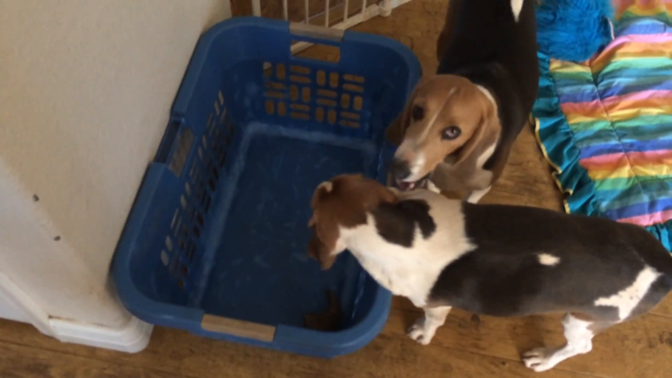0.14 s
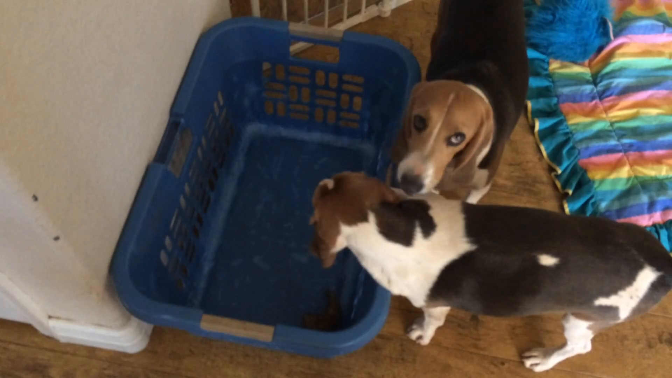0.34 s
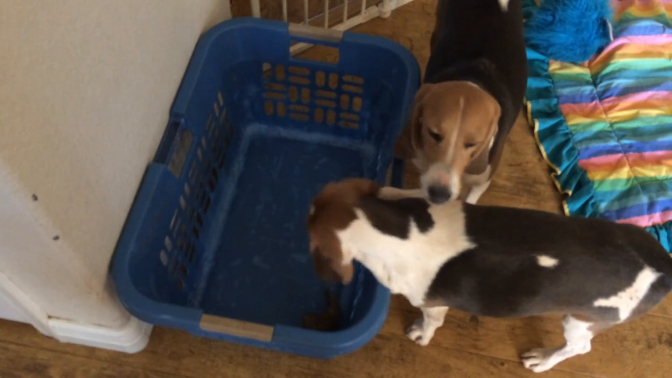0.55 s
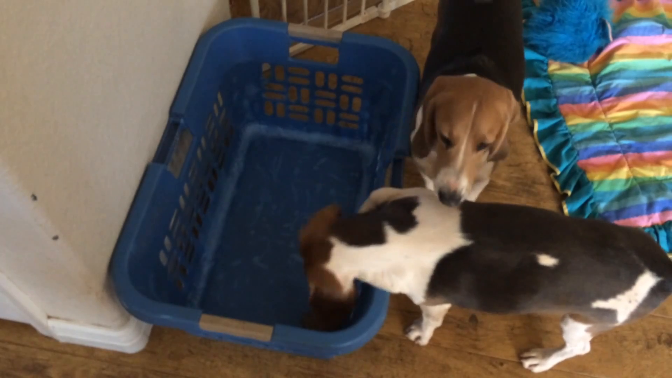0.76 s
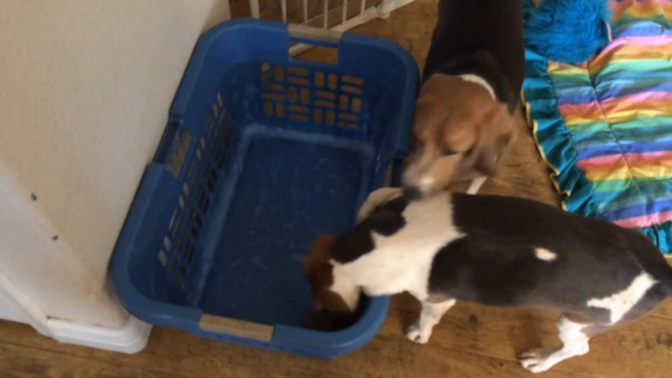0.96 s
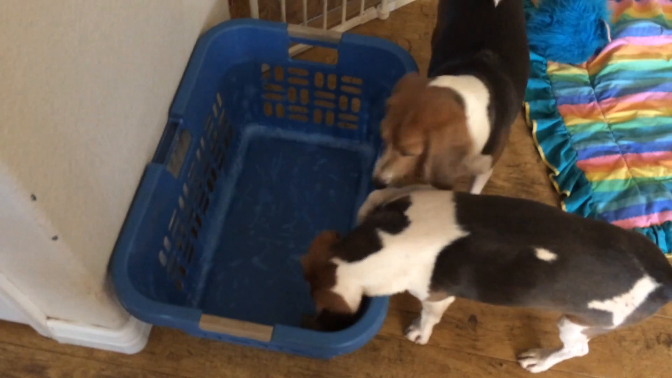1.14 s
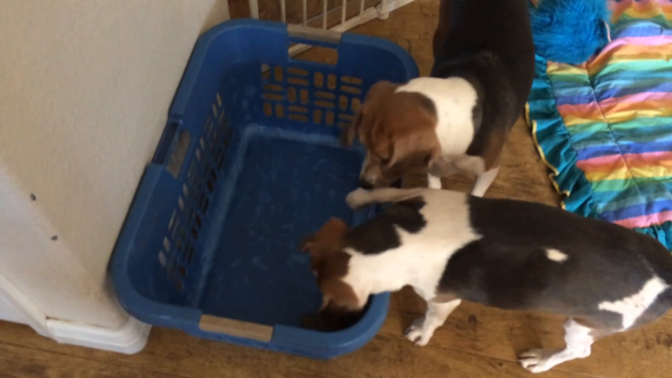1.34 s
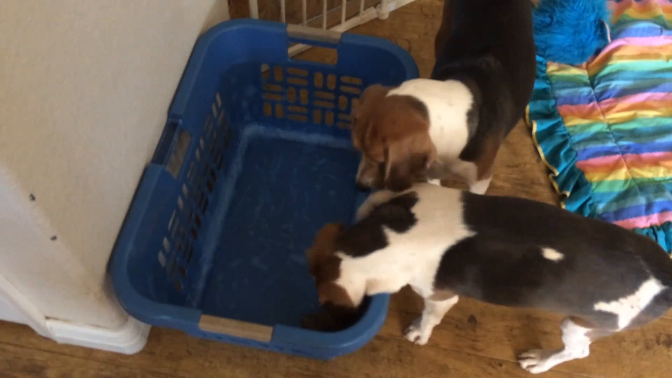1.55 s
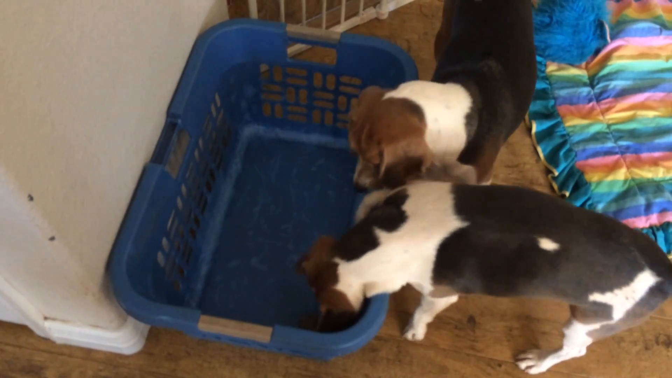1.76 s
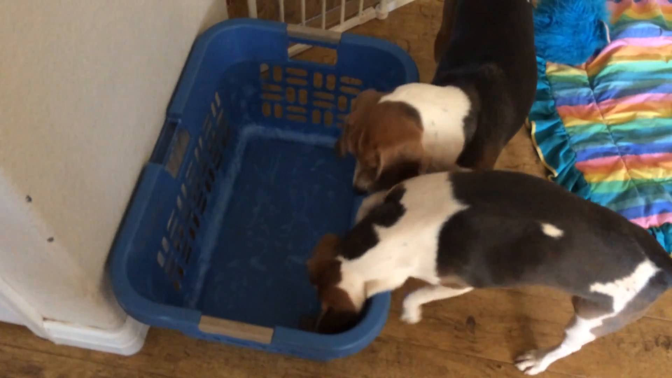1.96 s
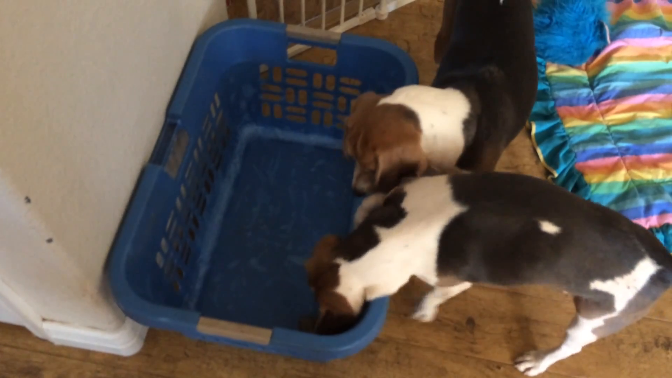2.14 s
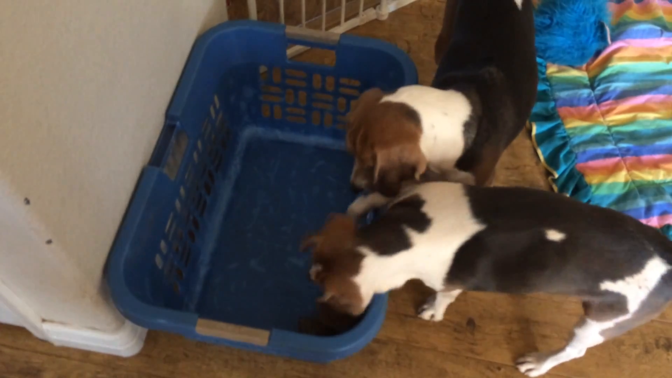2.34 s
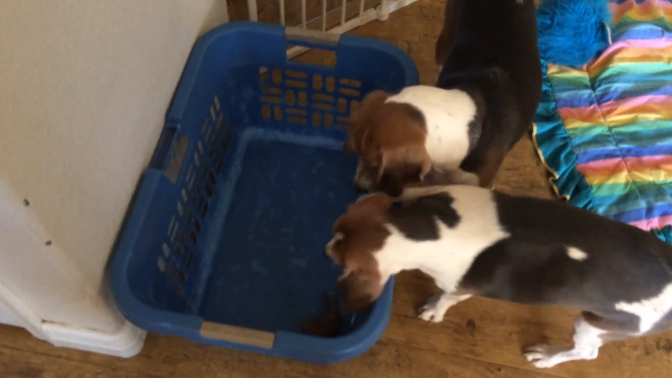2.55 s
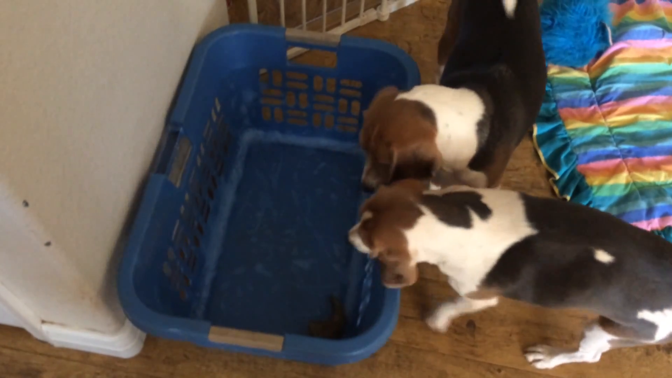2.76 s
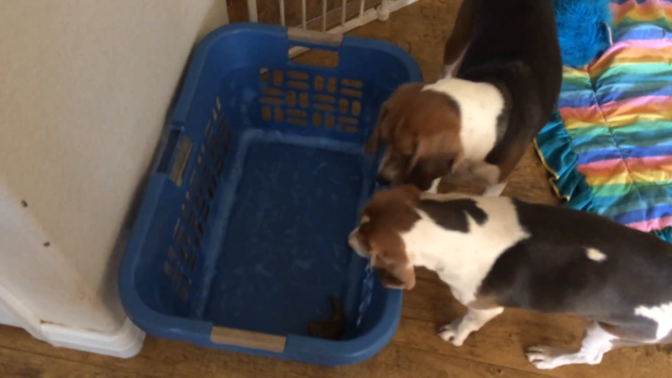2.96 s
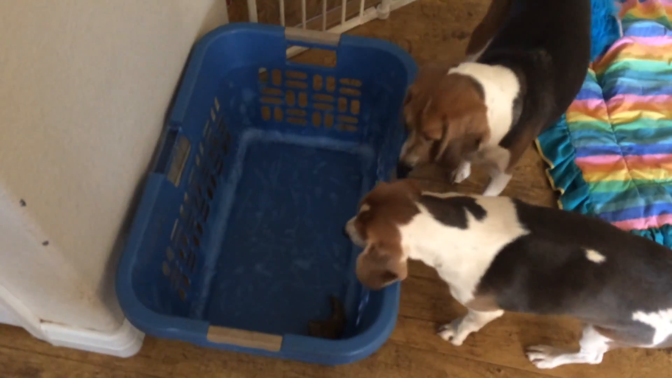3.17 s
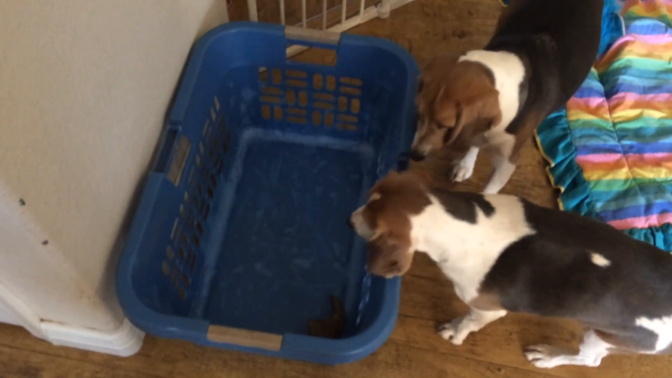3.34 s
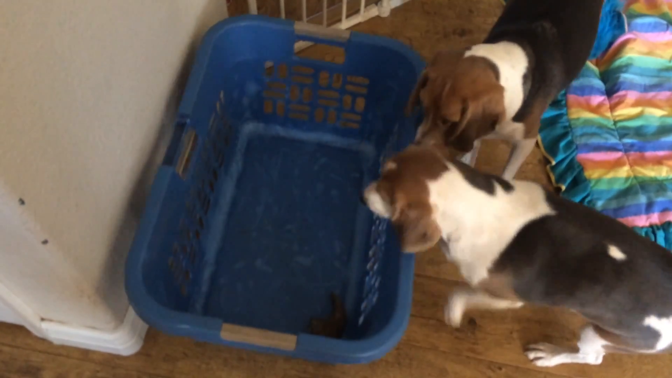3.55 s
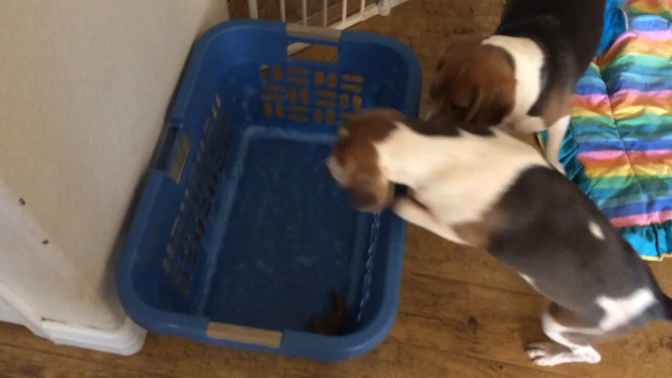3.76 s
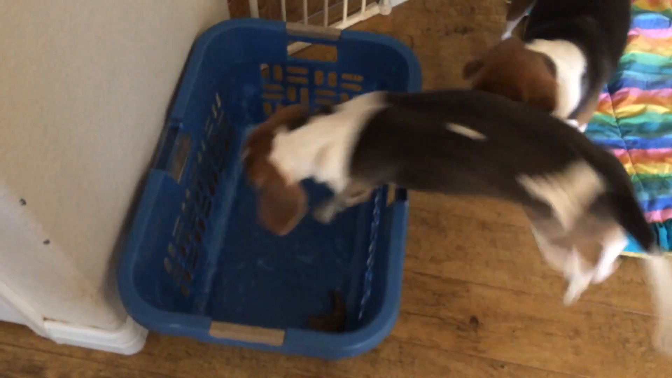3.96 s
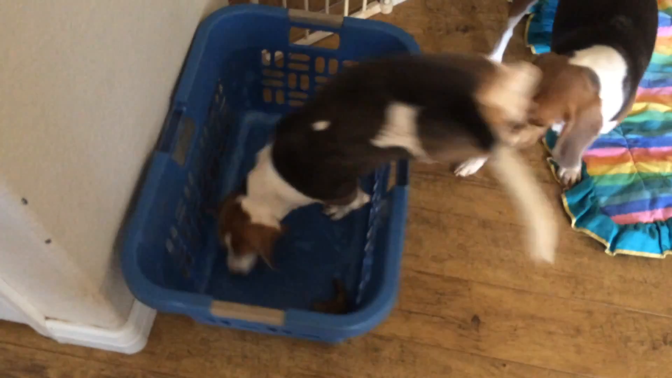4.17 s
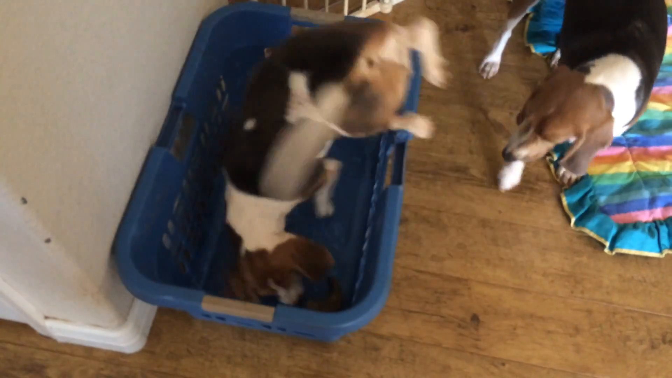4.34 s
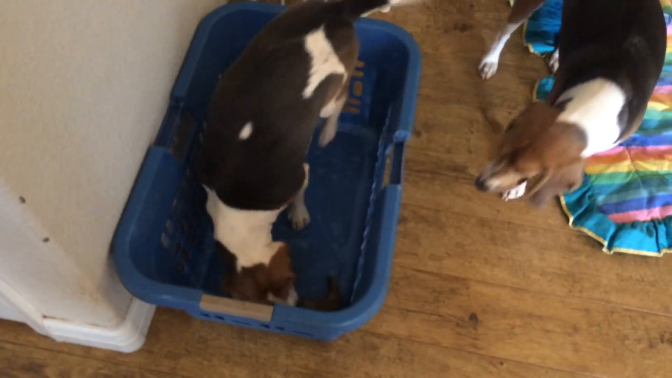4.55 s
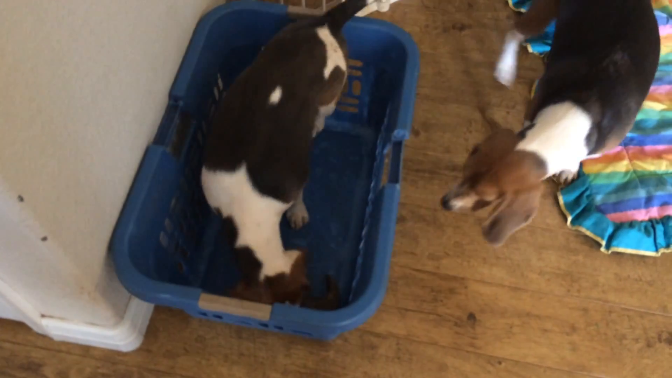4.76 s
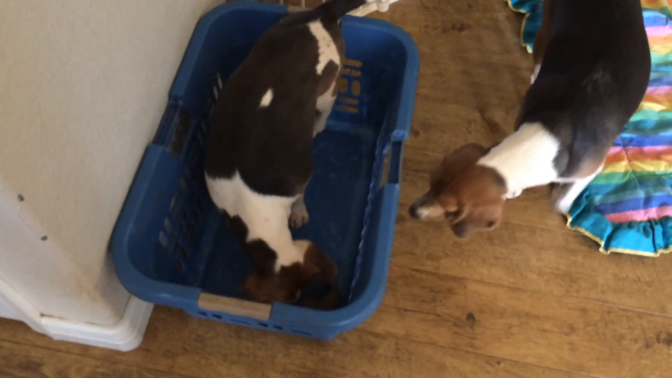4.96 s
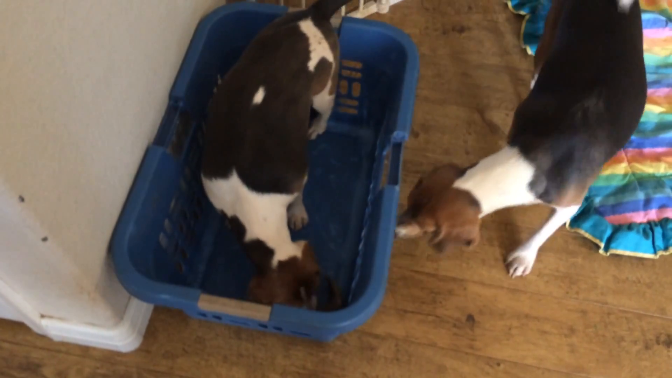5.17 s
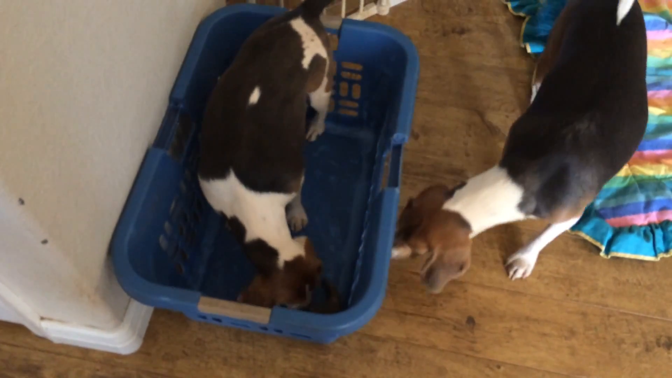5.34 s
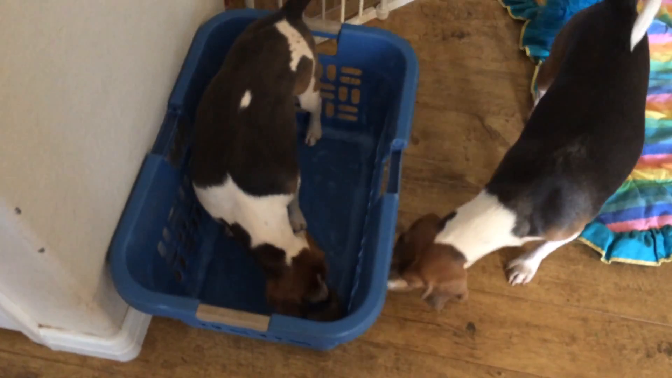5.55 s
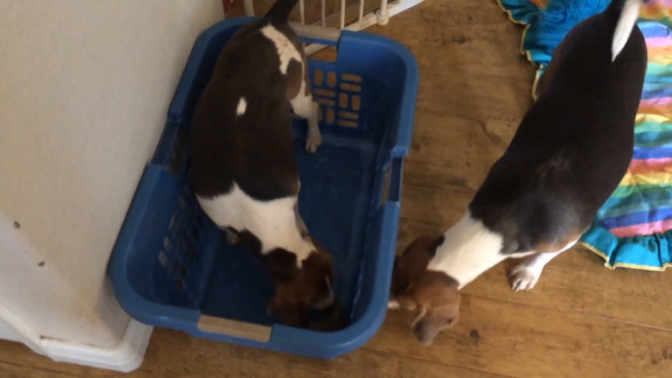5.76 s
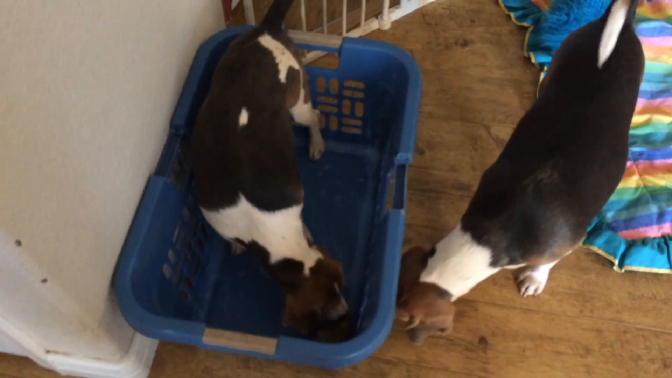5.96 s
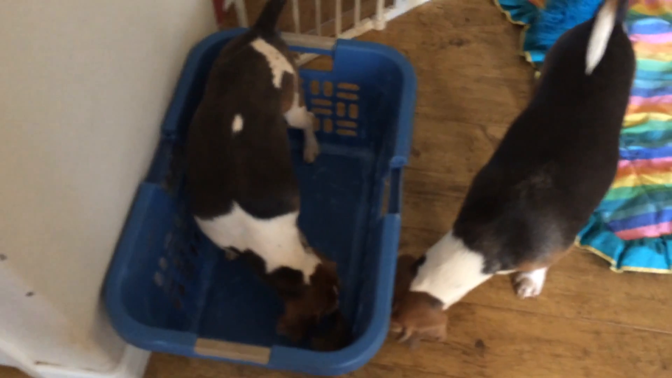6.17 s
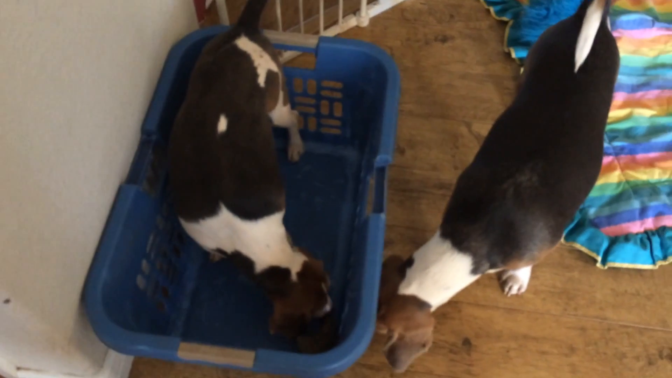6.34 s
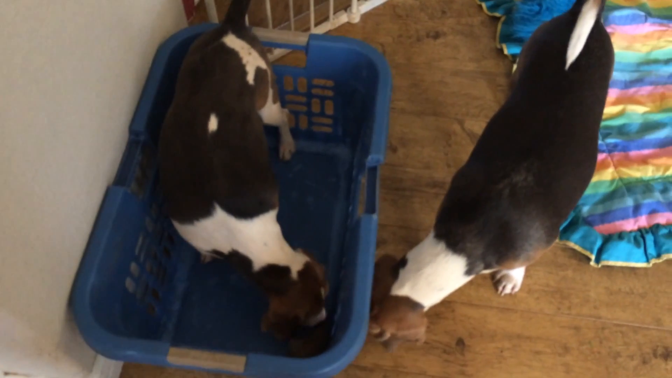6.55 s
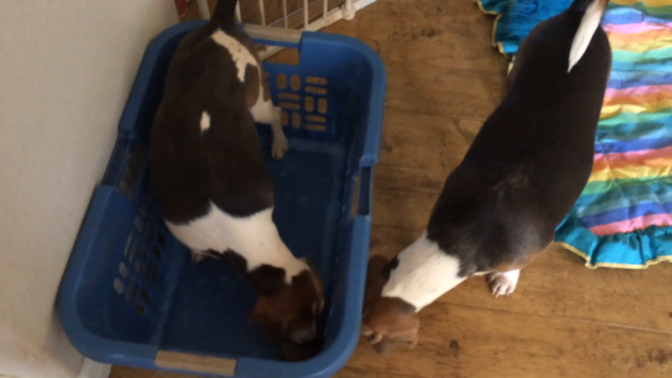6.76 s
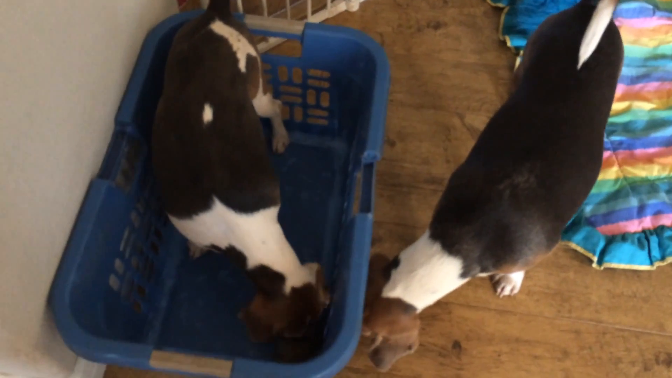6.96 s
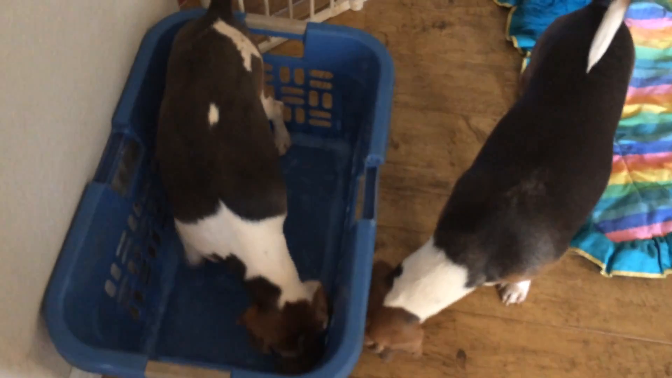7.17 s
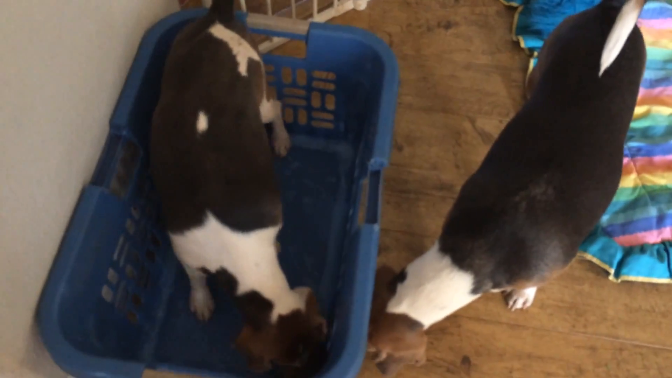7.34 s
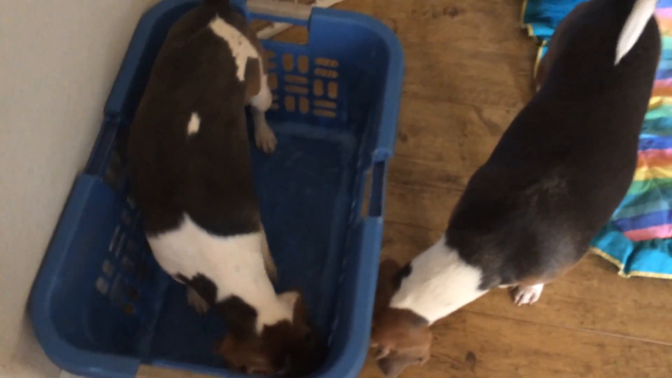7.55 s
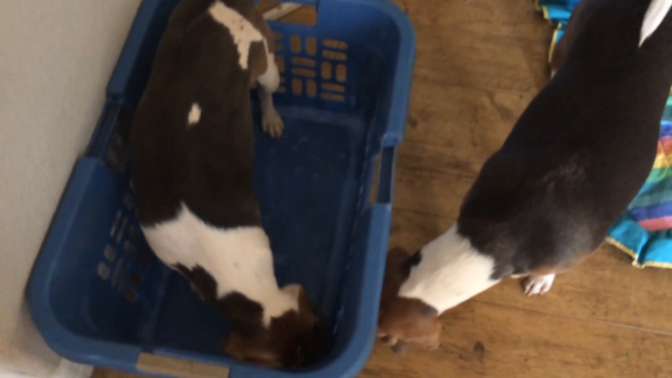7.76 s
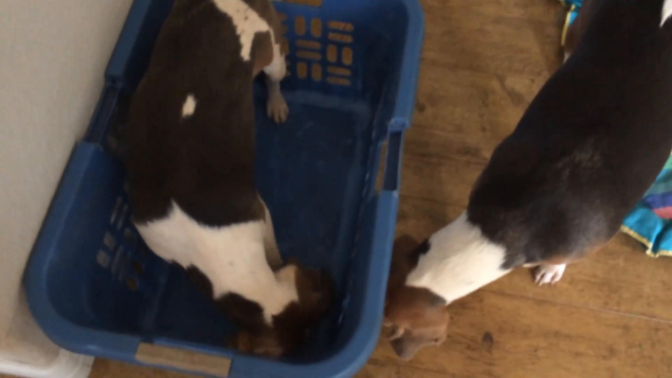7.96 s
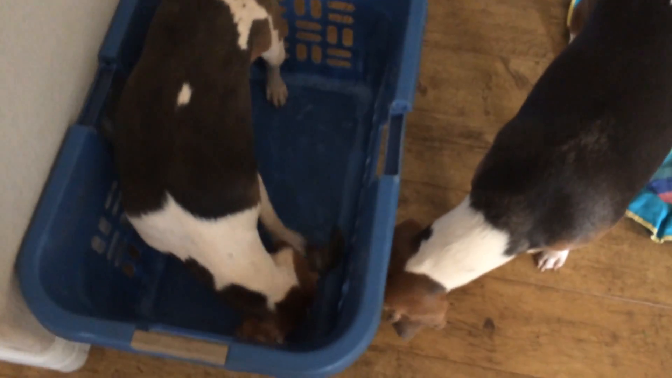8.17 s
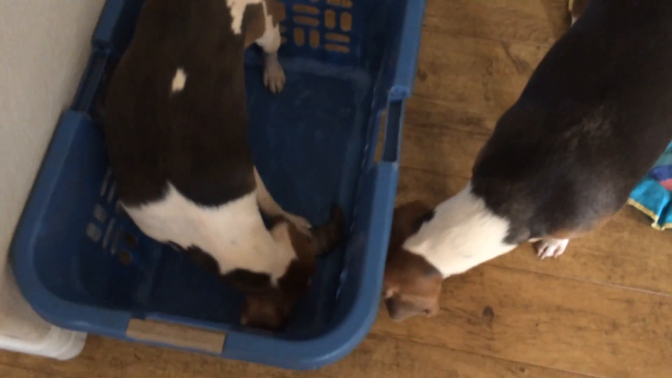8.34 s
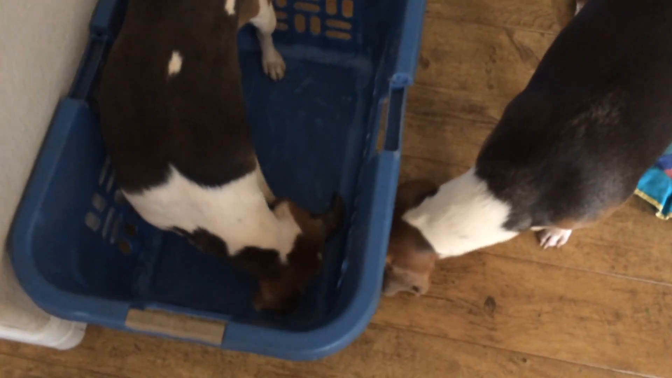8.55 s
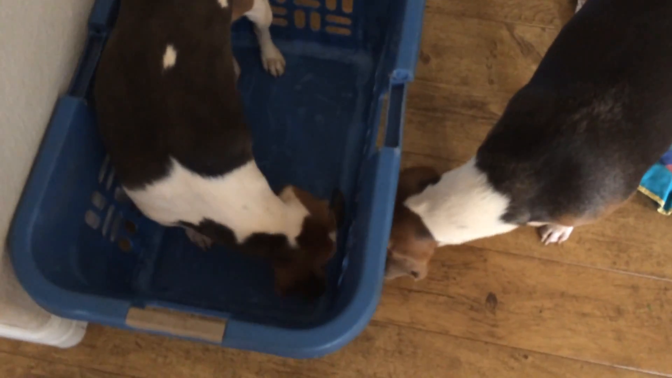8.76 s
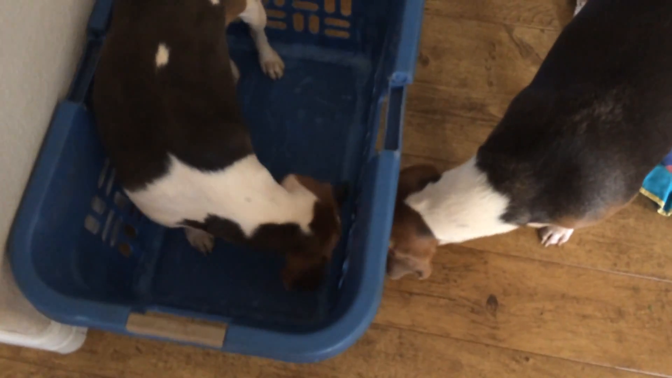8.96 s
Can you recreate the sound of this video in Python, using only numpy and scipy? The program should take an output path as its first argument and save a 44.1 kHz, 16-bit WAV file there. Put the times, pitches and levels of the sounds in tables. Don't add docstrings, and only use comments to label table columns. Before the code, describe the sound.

Faint brushes and ticks, then a burst of hollow plastic thuds and claw clatter, one later heavy paw knock, and scattered scratching over quiet hum.

```python
import sys
import numpy as np
from scipy import signal
from scipy.fft import rfft, irfft
from scipy.io import wavfile

SR = 44100
rng = np.random.default_rng(int(sys.argv[2]) if len(sys.argv) > 2 else 0)


def master(y):
    cut = np.clip(np.atleast_2d(y).T, -1, 1)
    pcm = np.round(cut * 32767)
    wavfile.write(sys.argv[1], SR, pcm.astype(np.int16))


def to_linear_factor(level_db):
    exponent = np.asarray(level_db, float) / 20
    return 10 ** exponent


N = 397341


def band(x, low_hz, high_hz):
    return signal.sosfilt(signal.butter(2, [low_hz, high_hz], "band", fs=SR, output="sos"), x)


def rms_one(x):
    return x / np.sqrt(np.mean(x ** 2) + 1e-20)


def peak_one(x):
    return x / np.max(np.abs(x))


def at_hz(hz, points_hz, values):
    return np.interp(np.log(hz), np.log(points_hz), values)


def drift(rate_hz):
    knot_hz = 400
    knots = rng.standard_normal(int(N / SR * knot_hz) + 2)
    r = np.exp(-2 * np.pi * rate_hz / knot_hz)
    slow = signal.lfilter([1], [1, -2 * r, r * r], np.tile(knots, 2))[len(knots):]
    return np.interp(np.arange(N) / SR * knot_hz, np.arange(len(slow)), rms_one(slow))


def ring(clicks, hz, t60_s):
    r, w = to_linear_factor(-60 / (t60_s * SR)), 2 * np.pi * hz / SR
    return signal.lfilter([0, np.sin(w)], [1, -2 * r * np.cos(w), r * r], clicks + 1e-18)


def resonances(x, peaks, patchy_db=0):
    out = 0
    for k, (hz, width_hz, level_db) in enumerate(peaks):
        r = np.exp(-np.pi * width_hz / SR)
        poles = [1, -2 * r * np.cos(2 * np.pi * hz / SR), r * r]
        patches_db = patchy_db * drift(20.0) if patchy_db else 0
        mode = signal.lfilter([1 - r * r, 0, r * r - 1], poles, x)
        out = out + (-1) ** k * to_linear_factor(level_db + patches_db) * mode
    return rms_one(out)


# start_s, peak_db, wall_hz, hardness_db
TICKS = [(0.359, -66, 890, -20), (0.408, -64.5, 877, 7.5), (2.302, -38.5, 1954, 10),
         (2.354, -31, 670, -3.5), (3.174, -33.5, 1075, -29), (3.187, -37.5, 770.4, -3.5),
         (3.657, -67, 1500, 9.5), (4.048, -48.5, 1500, 4), (4.1457, -25.5, 925, 5.5), (4.178, -17, 2000, 0),
         (4.271, -25, 865, -12.5), (4.348, -20, 756, -25), (4.417, -34, 1500, 6.5),
         (4.4315, -6.5, 856, -2.5), (4.731, -60, 1620, 7), (3.657, -65, 1500, 9), (4.048, -53, 1502, 5.5),
         (5.239, -48, 1475, 1), (5.443, -37, 896.5, -4), (5.477, -37.5, 917, -5), (5.493, -32, 935, -2),
         (5.597, -54, 1515, 3), (5.999, -48, 838, 4.5), (7.146, -46, 1490, -1), (7.321, -49.5, 1310, -15.5),
         (7.512, -45.5, 972, -1), (8.776, -47, 937, -21), (8.824, -33, 915, -38)]
# start_s, peak_db, wall_hz, hardness_db
CLACKS = [(0.06, -49, 2050, -22), (0.541, -44.5, 706, -14), (1.309, -60, 645, 7), (1.564, -49.5, 1600, -13),
          (2.26, -66, 820, 9), (2.319, -39.5, 1280, 12), (2.341, -30, 1000, -15), (2.974, -46.5, 721, 4),
          (3.288, -32.5, 1210, 10.5), (3.308, -38, 2040, 15), (3.647, -56.5, 899, 8),
          (3.857, -31.5, 1507, 0.5), (3.889, -34, 1000, -15), (4.402, -13.5, 1440, 0),
          (4.4445, -14.5, 1140, -1), (4.481, -20.5, 910, 1), (5.2456, -22.5, 963, -8.5),
          (5.428, -17.5, 900, -13), (5.464, -18, 1030, -10.5), (6.409, -45.5, 859, -14.5),
          (7.274, -28, 1010, -22), (7.443, -42, 940, -18.5), (7.657, -32.5, 1000, -15),
          (7.854, -27.5, 897, -13.5), (7.906, -35, 870, -17), (8.195, -36, 1024, 0.5),
          (8.697, -38.5, 1270, -23)]
# start_s, peak_db, wall_hz, hardness_db
RATTLES = [
    (3.874, -8.5, 850, -10),
    (3.924, -23.5, 1270, -1.5),
    (3.939, -15.5, 750, -6),
    (3.966, -9.5, 1060, -8),
    (4.3055, -18, 960, -7.5),
    (7.169, -53.5, 1122, 1.5),
    (7.962, -30, 860, 0.5),
]
# start_s, peak_db, wall_hz, hardness_db
NICKS = [(3.932, -32.5, 1300, 3), (3.976, -18, 1500, -13), (4.152, -23.5, 1500, 3), (4.194, -21, 2000, -10),
         (4.2175, -15.5, 1610, -4.5), (4.299, -27.5, 1500, -0.5), (4.302, -25, 2200, 0),
         (4.43, -5.5, 820, 3), (4.623, -59, 1500, 9.5), (4.83, -34, 1400, 8.5), (5.2, -49.5, 1510, 2.5),
         (5.452, -46, 1000, -0.5), (5.507, -43, 1000, 2.5), (7.9536, -34, 1200, 0),
         (7.968, -30.5, 1900, -8.5), (10, -35.5, 1600, -3), (8.24, -35.5, 2000, -5), (9.2, -34, 1100, -8),
         (8.312, -36.5, 1600, -5.5), (8.339, -35.5, 1100, -10), (8.372, -42.5, 900, -12)]


def claws():
    kinds = [  # rows, top_db re hardness, chatter t60_s
        (TICKS, 1.1, 0.029), (CLACKS, -12, 0.029), (RATTLES, -4, 0.048), (NICKS, -1.5, 0.0059)]
    rise_s, top_lasts = 0.00069, 1.6
    out, t = np.zeros(N), np.arange(SR // 8) / SR
    for rows, top_db, t60_s in kinds:
        for start_s, peak_db, wall_hz, hardness_db in rows:
            chatter = rng.standard_normal(len(t))
            force = chatter * to_linear_factor(-60 * t / t60_s) * np.minimum(t / rise_s, 1)
            force[8] += 5.0
            quick = force * to_linear_factor(-60 * t / (top_lasts * t60_s))
            tone = resonances(force, [(wall_hz, wall_hz * 0.4, 0), (1200, 1800, -7)])
            body = peak_one(band(tone, 450, 2700))
            edge = to_linear_factor(hardness_db + 4.0) * peak_one(band(force, 2900, 7900))
            top = to_linear_factor(hardness_db + top_db + 5.0) * peak_one(band(quick, 6140, 11400))
            blow = to_linear_factor(peak_db - 3.0) * (body + edge + top)
            i = round(start_s * SR)
            out[i:i + len(t)] += blow[:N - i]
    return out


# mode_hz, width_hz, level_db
WALL = [(728, 45, 10.5), (839, 11, 3.5), (970, 150, 1), (1060, 35, 8.5), (1274, 51, -6), (1410, 55, -8.5),
        (1700, 44, -11), (2140, 40, -2.5), (2491, 17, -17), (2655, 110, 5), (3280, 77, -15),
        (3400, 54, -11.5)]


def wall(x, ring_db):
    return x + to_linear_factor(ring_db) * np.sqrt(np.mean(x ** 2)) * resonances(x + 1e-18, WALL)


# mode_hz, level_db, t60_s
TUB = [(88, -7, 0.048), (145, 0, 0.15), (200, -1, 0.31), (291, -3, 0.26), (330, 0, 0.19), (364, -6.5, 0.21),
       (434, 4, 0.24), (626, -12.5, 0.089), (670, -10.5, 0.088)]


def tub(starts_s, strengths_db):
    at = np.round(starts_s * SR).astype(int)
    out = 0
    for k, (mode_hz, level_db, t60_s) in enumerate(TUB):
        luck_db = 6.0 * rng.standard_normal(len(at))
        clicks = np.zeros(N)
        clicks[at] = to_linear_factor(strengths_db + level_db + luck_db) * (-1) ** k
        out = out + ring(clicks, mode_hz, t60_s)
    return signal.lfilter([0.08], [1, -0.92], out)


# start_s, peak_db (under 600 Hz), push_hz, share_db (left ringing in the tub)
THUDS = [(2.02, -57, 180, 0), (2.342, -35, 201, -10), (3.174, -37.5, 160, -8), (3.875, -15, 369, -10),
         (3.877, -20.5, 435, -29), (3.882, -25, 151, -13), (3.9379, -13, 315, -25), (3.965, -34, 286, 6),
         (4.11, -42, 127, 0.5), (4.206, -37, 177, 0.5), (4.303, -28.5, 307, -13), (4.35, -35, 192, 5),
         (4.383, -27.5, 128, -25), (4.4292, -25.5, 461, -6.5), (4.804, -42.5, 340, -1.5),
         (4.838, -28, 172, -29), (5.153, -40, 315, -19), (5.183, -52, 421, 5.5), (5.255, -33.5, 198, -2.5),
         (5.284, -41, 182, -0.5), (5.425, -42.5, 176, 1.5), (5.462, -9, 361, -15.5),
         (5.49, -18.5, 365, -33.5), (6.01, -36.5, 333, -21.5), (6.415, -43, 210, -9.5),
         (7.06, -49.5, 284, -9), (7.23, -44.5, 260, -8), (7.279, -29, 374, -8), (7.291, -30, 229, -20),
         (7.851, -23, 354, -33), (7.866, -35.5, 340, -8), (7.897, -42, 330, -25), (7.906, -35.5, 213, -31),
         (7.924, -47, 260, -25), (7.942, -36, 285.4, -1), (8.701, -45.5, 201, -26),
         (8.775, -44.5, 233, -14), (8.828, -45.5, 484, -12.5), (8.87, -60.5, 367, -0.5),
         (8.95, -57, 372, 0.5)]


def thuds():
    rows, out = np.array(THUDS), np.zeros(N)
    t = np.arange(SR // 4) / SR
    for start_s, peak_db, push_hz, share_db in THUDS:
        cycles = t * push_hz / 1.3
        push = (cycles * np.exp(1 - cycles)) ** 3.1
        panel = to_linear_factor(share_db - 4.5 - 60 * t / 0.38) * np.minimum(cycles, 1)
        thud = to_linear_factor(peak_db) * (push + panel) * np.sin(2 * np.pi * push_hz * t)
        i = round(start_s * SR)
        out[i:i + len(t)] += thud[:N - i]
    return out + tub(rows[:, 0], rows[:, 1] + rows[:, 3] - 5)


def stroke(fastest_s, level_db, rise_s, fall_s):
    t = np.arange(N // 32 + 1) * 32 / SR - fastest_s
    away = np.where(t < 0, -t / rise_s, t / fall_s)
    loss_db = 22 * np.minimum(away, 5) ** 1.5
    return to_linear_factor(2 * (level_db - loss_db))


# fastest_s,
# level_db, rise_s, fall_s, top_db (re level)
SCRAPES = [(2.62, -58.5, 0.1, 0.26, -5), (2.85, -53.5, 0.18, 0.14, -6), (3.16, -66.5, 0.18, 0.069, -1),
           (3.25, -74, 0.099, 0.11, 3), (3.864, -43.5, 0.033, 0.071, -8), (4.15, -30, 0.038, 0.11, -3.5),
           (4.21, -32, 0.12, 0.085, -30), (4.275, -38, .04, 0.028, -15), (4.325, -54.5, 0.11, 0.12, 5),
           (4.38, -38.5, 0.1, 0.034, -26), (4.47, -40, 0.019, 0.26, -27), (4.82, -35, 0.058, 0.028, -6),
           (5.07, -65.5, 0.21, 0.25, -1), (5.191, -57.5, 0.083, 0.12, -14.5),
           (5.456, -39.5, 0.021, 0.0088, -57), (7.632, -53, 0.14, 0.17, -8),
           (7.665, -41, 0.032, 0.034, -21), (7.965, -35, 0.039, 0.093, -9.5),
           (8.031, -40.5, 0.097, 0.037, -15), (8.2, -43, 0.059, 0.15, -12.5), (8.281, -40, 0.13, 0.14, -11),
           (8.365, -49, 0.16, 0.032, -5.5), (8.691, -52, 0.11, 0.034, -16.5), (9.0, -45, 0.047, 0.025, -12)]
# fastest_s, level_db, rise_s, fall_s, top_db (re level)
BRUSHES = [(.07, -62, 0.094, 0.042, -16), (.17, -68, 0.18, .05, -13), (.38, -81, .1, .05, -22),
           (.57, -72, .02, 0.073, -28), (.78, -66.5, 0.1, 0.18, -9), (1.3, -81, .04, .08, 3),
           (1.43, -65.5, 0.072, 0.085, -10), (4.118, -46, .015, .05, 6.5), (4.308, -33.5, .02, 0.027, -3.5),
           (5.205, -63, 0.025, 0.044, -5), (6.44, -57, 0.051, 0.046, -9), (7.275, -50.5, 0.045, 0.096, -35),
           (7.33, -66, 0.061, .05, -12), (7.9, -60, 0.019, 0.026, -6), (8.2, -52, .015, .02, 5.5)]
# fastest_s, level_db, rise_s, fall_s
SHOVES = [
    (3.195, -44.5, 0.03, 0.025),
    (4.219, -40.5, 0.12, 0.17),
    (4.335, -37, 0.15, 0.045),
    (4.38, -30.5, 0.055, 0.029),
    (5.19, -53, 0.055, 0.065),
    (5.45, -39, 0.019, 0.017),
    (7.279, -46.5, 0.098, 0.061),
    (7.94, -45, 0.093, 0.055),
]
# mode_hz, width_hz, level_db
RUB_BANDS = [(773, 250, -6), (1060, 310, -1), (1400, 140, -2.5), (1880, 380, -5), (2940, 7100, -17)]
# mode_hz, width_hz, level_db
RUB_TOP = [(4326, 1800, 3), (6200, 3300, 6), (8800, 4200, 4.5), (12900, 3400, -3)]
# mode_hz, width_hz, level_db
RUB_TUB = [(335, 210, -0.5), (431.4, 84, 4), (580, 190, -12.5)]


def rubs():
    drone_db, slips_per_s = -12, 3500
    power = np.zeros((3, N // 32 + 1))
    for *row, top_db in list(SCRAPES) + list(BRUSHES):
        power += stroke(*row) * to_linear_factor([[0], [2 * top_db], [2 * drone_db]])
    for row in SHOVES:
        power[2] += stroke(*row)
    gains = np.repeat(np.sqrt(power), 32, axis=1)[:, :N]
    sizes = to_linear_factor(2.4 * np.minimum(rng.exponential(1, (2, N)), 4)) * rng.choice([-1, 1], (2, N))
    slips = sizes * (rng.random((2, N)) < slips_per_s / SR)
    low, top = slips * to_linear_factor([2.5 * drift(41.0), 0.6 * drift(45.0)])
    layers = [band(resonances(low, RUB_BANDS, patchy_db=3.0), 550, 5600),
              resonances(top, RUB_TOP, patchy_db=0.9),
              resonances(low, RUB_TUB, patchy_db=-3.0)]
    return to_linear_factor(-1) * np.sum(gains * layers, axis=0)


# centre_s, level_db (rms), pitch_hz, length_s
SQUEAKS = [(0.064, -56, 2050, 0.027), (0.371, -66, 2040, 0.05), (0.378, -64.5, 810, 0.088),
           (0.575, -61, 820, 0.071), (0.578, -68, 1680, 0.039), (0.796, -67, 770, 0.16),
           (.8, -78, 1900, 0.15), (0.96, -80, 4500, 0.045), (2.1, -77, 6800, 0.036),
           (2.262, -66, 3900, .012), (2.705, -58, 3400, 0.056), (2.935, -60, 3680, 0.016),
           (4.148, -29, 7700, 0.011), (6.42, -55.5, 910, 0.054), (6.451, -44.5, 910, 0.017),
           (6.465, -60.5, 760, .03), (5.7, -68.5, 4150, 0.095), (6.63, -72, 4280, 0.015),
           (7.302, -58.5, 3990, .015), (7.322, -60, 4000, 0.011), (7.616, -59, 5900, 0.081),
           (7.943, -42, 5160, 0.014), (7.95, -50, 6400, .015), (7.953, -41.5, 4000, .012),
           (7.956, -42.5, 7500, 0.0096), (8.0, -47, 5800, 0.024), (8.036, -51, 6200, .012),
           (8.183, -38, 915, 0.017), (8.203, -52, 6200, .012), (8.243, -48.5, 2800, 0.014),
           (8.467, -63.5, 4300, 0.019), (8.67, -63, 2200, .04), (8.7, -59, 2030, .012),
           (8.826, -47, 2082, 0.0076)]


def squeaks():
    out, t = np.zeros(N), np.arange(-SR // 10, SR // 10) / SR
    for centre_s, level_db, pitch_hz, length_s in SQUEAKS:
        source = rng.standard_normal(len(t))
        if pitch_hz * length_s < 30:
            source = source + 4 * np.sin(2 * np.pi * pitch_hz * t)
        near = band(source, pitch_hz * 0.8, pitch_hz * 1.25)
        tone = resonances(near, [(pitch_hz, pitch_hz * 0.1, 0)])
        swell = to_linear_factor(level_db) * np.exp(-8 * (t / length_s) ** 2) * tone
        at = np.round((centre_s + t) * SR).astype(int)
        out[at[at >= 0]] += swell[at >= 0]
    return out


# band_hz, t60_s, level_db
ROOM = [(119.1, 0.41, 2.5), (256.3, .3, -1), (680, 0.45, -1), (2640, 0.52, 1.56), (3710, .36, 0.5),
        (5250, 0.49, -3.5), (7474, 0.41, -5.5), (12800, 0.2, -12.5)]


def room(x):
    edges_hz = 82 * 2 ** np.arange(0, 7.6, 0.5)
    white, out = rng.standard_normal((2, N)), 0
    hz, t60_s, level_db = np.transpose(ROOM)
    late = np.concatenate([np.zeros(round(0.0011 * SR)), x])[:N]
    for k, (low, high) in enumerate(zip(edges_hz, edges_hz[1:])):
        keep = to_linear_factor(-120 / (at_hz(low, hz, t60_s) * SR))
        energy = signal.lfilter([1 - keep], [1, -keep], band(late, low, high) ** 2 + 1e-18)
        noise = rms_one(band(white[k % 2], low, high))
        out = out + to_linear_factor(at_hz(low, hz, level_db)) * np.sqrt(energy) * noise
    return out - 0.3 * band(out, 3850, 5000) - 0.5 * band(out, 9800, 12000)


# line_hz, level_db (rms)
HUM = [(59.2, -57.5), (118.4, -62.5), (177.6, -65.5), (360.7, -77), (586.8, -84), (705.2, -89),
       (877.5, -79.5)]
# band_hz, density_db (per Hz)
FLOOR = [(20, -33.5), (40, -15), (60, -1.5), (90, -8), (120, -11), (180, -6.5), (260, -15), (350, -19.5),
         (480, -24), (870, -27.5), (1340, -33), (4000, -41.5), (15000, -49), (16500, -61.5)]


def background():
    t, hum = np.arange(N) / SR, 0
    for line_hz, level_db in HUM:
        waver_db = 1.0 + 0.69 * drift(3.3)
        hum = hum + np.sqrt(2) * to_linear_factor(level_db + waver_db) * np.cos(2 * np.pi * line_hz * t)
    hz = np.maximum(np.fft.rfftfreq(N, 1 / SR), 1)
    colour = to_linear_factor(at_hz(hz, *np.transpose(FLOOR)))
    air = irfft(rfft(rng.standard_normal(N)) * colour, N)
    return hum + to_linear_factor(-55.5 + 0.32 * drift(2.8)) * rms_one(air)


def scene():
    blows = wall(claws(), ring_db=-5.5) + thuds()
    friction = rubs() + squeaks()
    echo = room(to_linear_factor(-7.0) * blows + to_linear_factor(-13.5) * friction)
    return (blows + friction + echo + background())[None]


def low_pass(x):
    return signal.sosfilt(signal.butter(12, 17110, fs=SR, output="sos"), x)


def record(dry):
    rounded = 1.287 * np.tanh(dry / 1.263)
    top_cut = signal.cheby2(16, 30, 15700, fs=SR, output="sos")
    mix = signal.sosfilt(top_cut, rounded)
    return low_pass(mix)


dry = scene()
out = record(dry)
master(out)
```